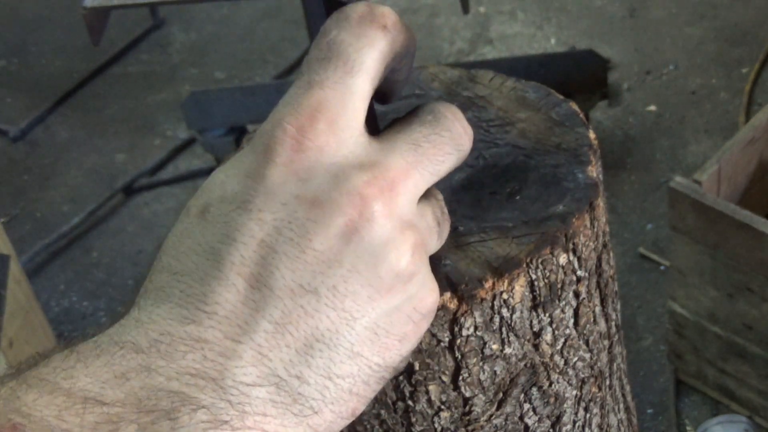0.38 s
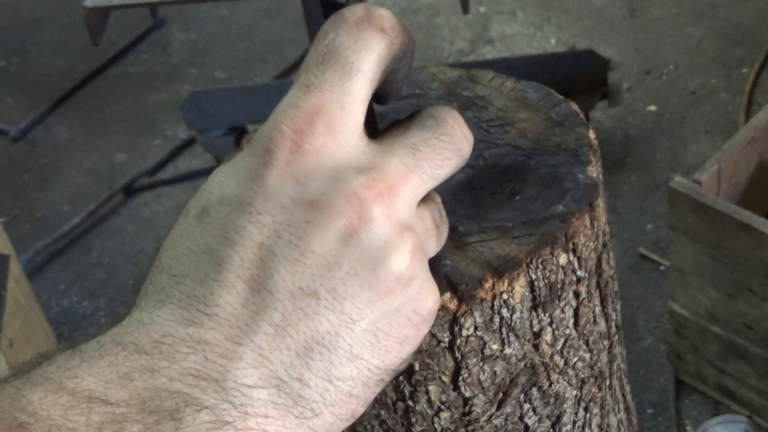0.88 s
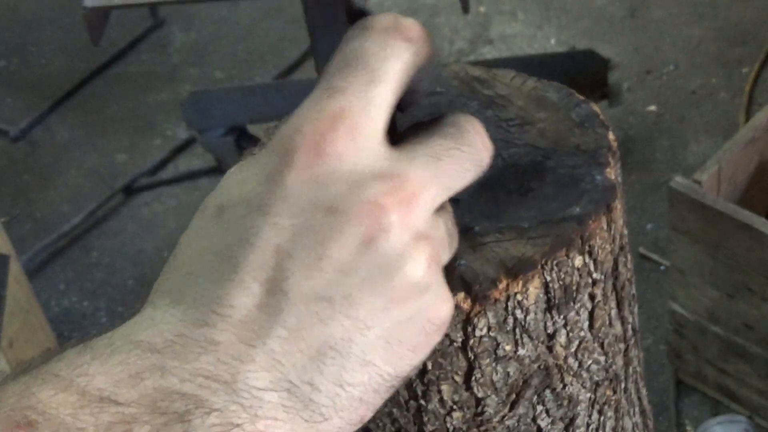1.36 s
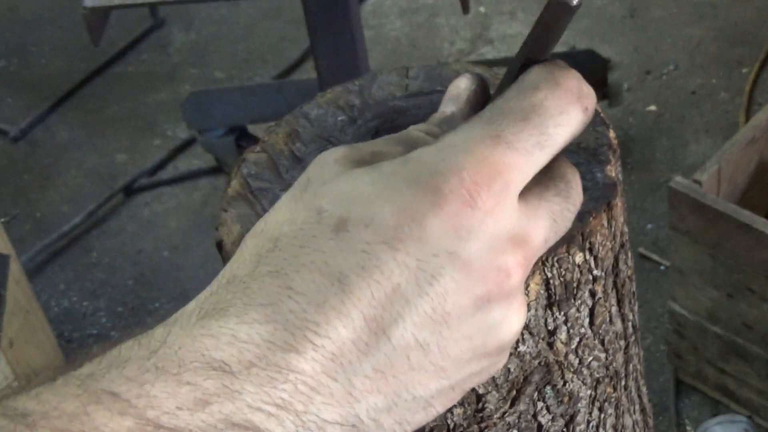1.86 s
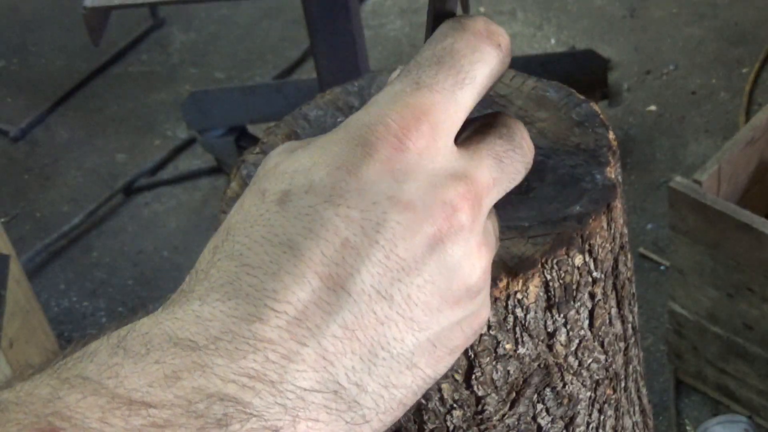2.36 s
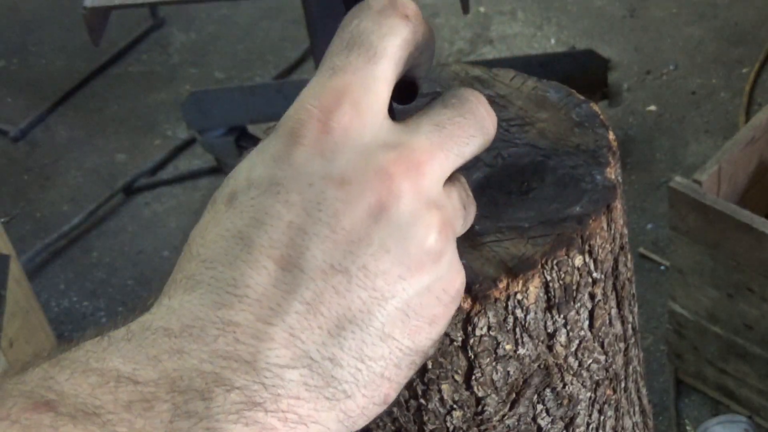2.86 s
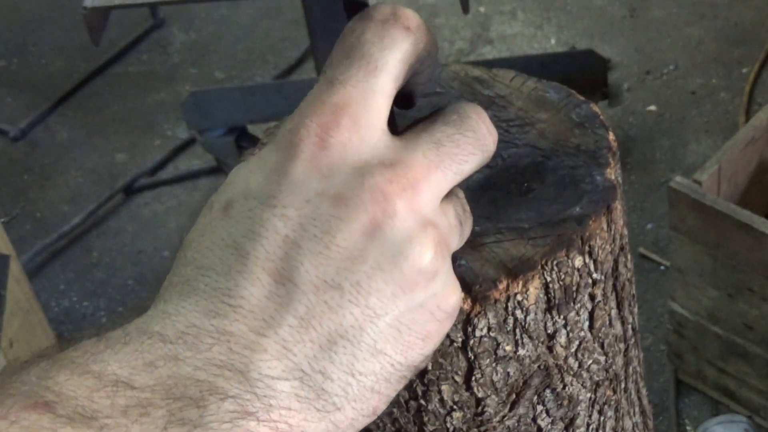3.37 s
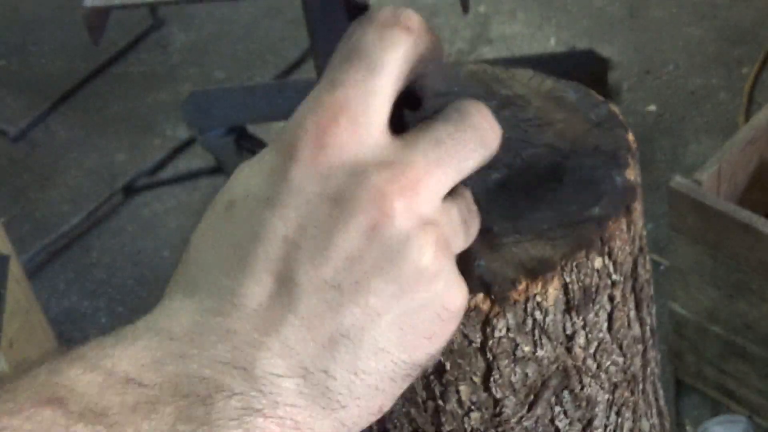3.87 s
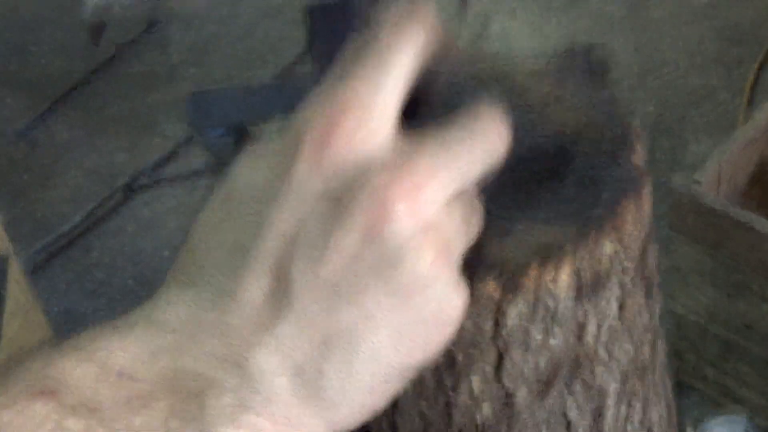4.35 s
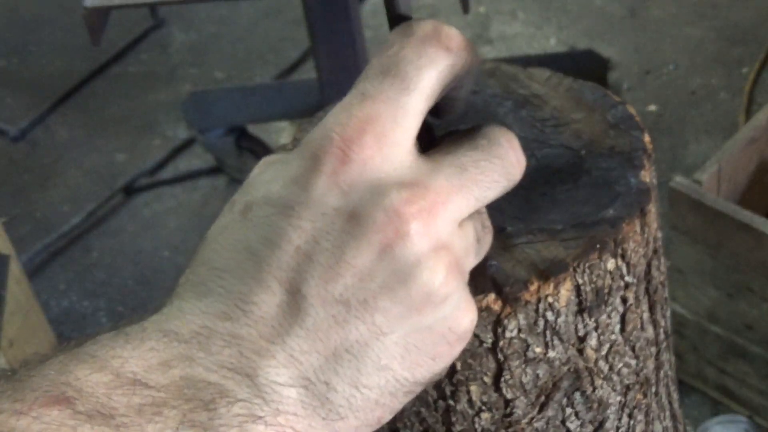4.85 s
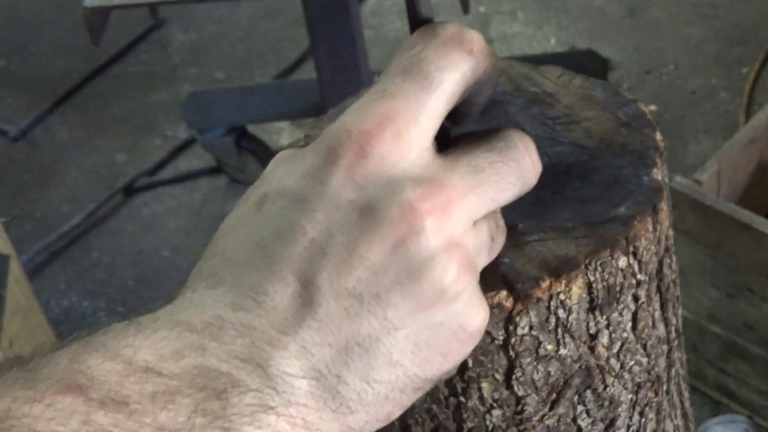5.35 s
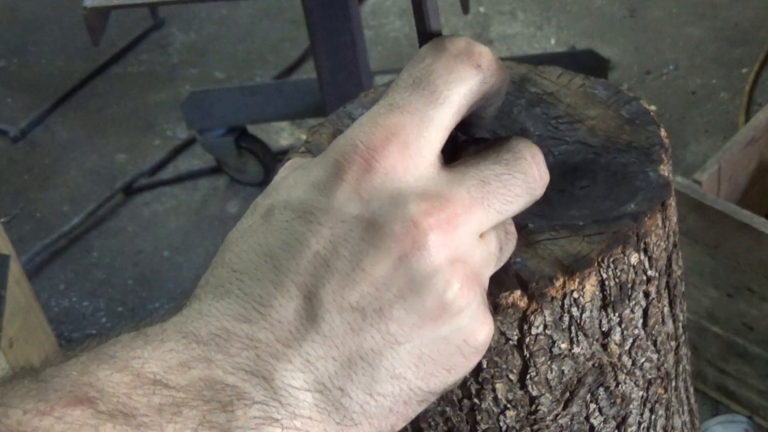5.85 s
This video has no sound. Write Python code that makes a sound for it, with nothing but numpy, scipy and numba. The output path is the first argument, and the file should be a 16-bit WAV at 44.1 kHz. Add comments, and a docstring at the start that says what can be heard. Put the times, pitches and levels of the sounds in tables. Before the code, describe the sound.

A steady, soft workshop hush with faint hum and a barely audible rapid camera blip runs throughout. From 0 to 0.55 s fingers rustle airily and tick on steel. A light, narrow metallic tap comes at 0.6 s, then a huge bright steel crack at 1.08 s with a short woody, midrange knock, close echoes and a room tail fading within half a second; a faint low drone lingers longer. Around 1.7 s a tiny steel part clinks, with small rustles and clicks until 2.7 s, and a dull distant thud at 2.86 s. A stronger tap lands at 3.27 s, a soft thud at 3.69 s, then full blows at 3.74, 4.33, 4.9, 5.5 and 6.07 s, all similarly loud and squashed at the peak. Between them are faint drones, ticks and thuds near 4.75 and 5.93 s. The last blow is slightly drier, with no drone.

```python
"""Over steady room hush, hum and a faint periodic blip, fingers rustle as band-shaped noise and tick as short bursts.
A hammer drives a hand-held steel punch into steel on a log: a light tap and a full blow, later a tap and five blows.
Each stroke sums damped modes of punch, work and log with a resonant crack; echoes and a noise tail answer it.
After all but the last blow something loose drones as a decaying sine; dull thuds of noise over a low mode follow.
The camera's look-ahead limiter flattens the full blows."""
import sys
import numpy as np
from scipy import signal
from scipy.fft import rfft, irfft, next_fast_len
from scipy.io import wavfile
from scipy.ndimage import uniform_filter1d, minimum_filter1d
from numba import njit

SR = 44100
rng = np.random.default_rng(int(sys.argv[2]) if len(sys.argv) > 2 else 0)


def int16_out(signal):
    """Quantize to a 16-bit WAV file."""
    q = np.round(np.clip(np.atleast_2d(signal).T, -1, 1) * 32767)
    wavfile.write(sys.argv[1], SR, q.astype(np.int16))


def boost_factor(decibels):
    """Convert a level in decibels to a linear amplitude factor."""
    exponent = np.asarray(decibels, float) / 20
    return 10 ** exponent


N = 274522  # length in samples

# Source levels are those ahead of the room, the high-pass on the hits and the limiter.
# Spectrum of the room hush, relative: frequency_hz, density_db
HUSH_SPECTRUM = [(15, -44), (25, -18.5), (48, -6.5), (135, -9.5), (167, -5.5), (202, -17.5), (259, -4),
                 (288, -13), (809, -12), (1090, -14), (3150, -22.5), (15200, -33), (16500, -43)]
# Left-right likeness of the hush: frequency_hz, likeness (1 = nearly alike)
HUSH_LIKENESS = [(60, 1.0), (180, 1), (550, 0.91), (1650, 0.78), (4970, 0.62), (15000, 1)]
# Steady hum lines: frequency_hz, rms_db
HUM_LINES = [(57.5, -86.5), (259, -81.5), (521, -79)]
# Skin rubbing: centre_s, half_length_s, level_db, brightest_hz
RUBS = [(0.061, 0.037, -56, 8900), (0.193, .025, -60, 9400), (0.44, 0.026, -71.5, 9300),
        (0.734, 0.037, -73, 10700), (0.944, 0.027, -69, 8800), (1.516, 0.017, -66, 8950),
        (1.983, 0.019, -67, 8940), (2.962, 0.027, -74.5, 9060), (4.147, 0.016, -62, 8000)]
# Spectrum of rubbing skin, relative: frequency_hz, density_db
SKIN_SPECTRUM = [(1500, -13), (4000, -11), (7000, -8), (11000, -13.5), (15000, -17), (18000, -30.5)]
# Small clicks of fingers and grit on steel: centre_s, peak_db, pitch_hz, length_s
TICKS = [(0.252, -35.5, 6280, 0.0013), (0.3753, -41.5, 8700, 0.0011), (0.391, -48, 7940, .0008),
         (0.534, -48, 4000, .0008), (0.576, -56, 8900, .0008), (1.72, -56, 10000, 0.0009),
         (1.7345, -47, 4500, 0.0018), (1.7385, -53, 4200, .0008), (2.638, -54, 9520, 0.00091),
         (2.6903, -43, 9300, .0008), (4.122, -44, 8300, .0025), (4.271, -49, 7120, .0008),
         (5.449, -48.5, 6120, .0008), (5.72, -46, 12500, 0.00092), (5.942, -51, 8000, 0.00086)]
# Touches of a small steel part: start_s, level_db
CHIMES = [(1.7325, -67.5), (1.7374, -59)]
# Modes of the small steel part: frequency_hz, level_db, t60_s
CHIME_MODES = [(6050, 3.5, 0.08), (8200, 0, .1), (10400, -10, 0.1)]
# First echoes off near surfaces: delay_s, level_db
WALL_ECHOES = [(.0022, -4), (.0037, -11.5), (.006, -15), (0.0085, -14)]
# Reverberation time of the room: frequency_hz, t60_s
ROOM_DECAY = [(60, 0.31), (200, 0.46), (700, 0.44), (2000, 0.4), (5000, 0.34), (9000, 0.26), (14000, 0.15)]
# Slow part of the reverberant tail: frequency_hz, level_db
SLOW_TAIL = [(100, -16), (200, -23.5), (400, -37.5), (1000, -49.5), (3000, -61)]
# Left-right likeness of the tail: frequency_hz, likeness (1 = nearly alike)
ROOM_LIKENESS = [(60, 1), (150, 1), (380, 0.95), (950, 0.83), (2380, 0.9), (5980, 0.91), (15000, 1)]
# The room's strongest standing wave: frequency_hz, level_db, t60_s
STANDING_WAVE = (141, -26.5, 0.55)
# Light setting taps: start_s, stroke_level_db, crack_pitch_hz
TAPS = [(0.6053, -29.5, 5370), (3.2689, -18, 6360)]
# Full blows: start_s, stroke_level_db, crack_pitch_hz, peak_db (over the broad part of the crack),
# work_ring_db (not raised by the stroke level)
BLOWS = [(1.0754, 17, 8200, 5.5, 17.5), (3.7445, 17, 8200, 0, 18), (4.331, 17.5, 8200, 0.5, 16),
         (4.905, 18.5, 8200, 0.5, 16), (5.4993, 18, 8200, 3.5, 14.5), (6.073, 17.5, 7375, 10, 4.5)]
# How a tap splits its force, relative to the stroke level: punch_db, log_db, thump_db (direct body over
# that sent to the room), close_db (near crack), click_db, width (share of crack pitch), chatter_s (t60)
TAP_SPLIT = dict(punch_db=-9.5, log_db=5.5, thump_db=1.5, close_db=10.5, click_db=12.5, width=0.11, chatter_s=0.0045)
# How a full blow splits its force: the same names and units
BLOW_SPLIT = dict(punch_db=-21.5, log_db=-12, thump_db=-0.26, close_db=5, click_db=-2.5, width=0.33, chatter_s=0.014)
# Modes of the steel punch: frequency_hz, level_db, t60_s
PUNCH_MODES = [(1928, -8.5, 0.12), (2660, -2.5, .025), (3090, -2.5, 0.02), (4283, -0.5, 0.018),
               (4820, -7, .008)]
# Modes of the steel work: frequency_hz, level_db, t60_s
WORK_MODES = [(560, -1.5, 0.0076), (747, 1, .011), (942, 0.5, 0.012), (1100, 2, 0.012), (1317, -4.5, 0.024)]
# Modes of the log: frequency_hz, level_db, t60_s
LOG_MODES = [(89.8, -20, 0.26), (143, -18, 0.1), (213, -13.5, 0.052), (295, -2.5, 0.02), (342, 11, 0.013),
             (467, 5, 0.012), (668, -3.5, 0.021)]
# Broad part of the crack, relative: frequency_hz, gain_db
CRACK_SPECTRUM = [(100, 10.5), (500, 12.5), (1200, 5), (3000, -5), (5000, -6), (10000, 2), (11500, -8.5),
                  (15000, -13.5), (20000, -29.5)]
# First touch of the faces, relative: frequency_hz, gain_db
CLICK_SPECTRUM = [(500, -32), (2000, -12.5), (4500, -0.5), (7000, -1.5), (12000, -14.5), (16000, -19.5)]
# Drones after blows: start_s, frequency_hz, level_db, t60_s
DRONES = [(1.08, 167, -50, 3.9), (3.749, 181, -54, 1.5), (4.34, 181, -48.5, 2.5), (4.909, 181, -48, 1.2),
          (5.508, 181, -57.5, 0.92)]
# Far thuds: start_s, level_db, length_s, brightness_hz, low_mode_db
THUDS = [(2.863, -49.5, 0.07, 1400, 8.5), (3.694, -45.5, 0.041, 1500, 6.5),
         (4.735, -46.5, 0.043, 1800, 0.5), (4.812, -49.5, 0.025, 1500, 3.5), (5.934, -53, 0.014, 500, -6)]


def unit(x):
    """Root-mean-square normalisation: scales x to rms 1."""
    return x / np.sqrt(np.mean(x ** 2) + 1e-20)


def along(points, hz):
    """Interpolation on a logarithmic frequency axis through (frequency_hz, value) points."""
    f, v = np.transpose(points)
    return np.interp(np.log(hz + 1), np.log(f + 1), v)


def coloured(x, response):
    """Linear filtering: the spectrum of x is multiplied by a response of frequency."""
    size = next_fast_len(x.shape[-1] + 8192)  # zero padding keeps the end off the start
    spectrum = rfft(x, size) * response(np.fft.rfftfreq(size, 1 / SR))
    return irfft(spectrum, size)[..., :x.shape[-1]]


def paired(noises, likeness):
    """Interaural coherence: the mid-side balance of two unrelated noises sets left-right likeness."""
    def turn(hz):
        return np.arccos(np.clip(along(likeness, hz), -1, 0.98)) / 2
    mid, side = coloured(noises, lambda hz: np.array([np.cos(turn(hz)), np.sin(turn(hz))]))
    return np.array([mid + side, mid - side])


def ring(modes, t, scatter_db):
    """Modal superposition: exponentially damped sines, each with a randomly scattered strength."""
    hz, db, t60 = np.transpose(modes)[:, :, None]
    db = db + scatter_db * rng.standard_normal(db.shape)
    return np.sum(boost_factor(db - 60 * t / t60) * np.sin(2 * np.pi * hz * t), axis=0)


def add(track, start_s, sound):
    """Linear superposition of a sound on a track from its start time."""
    part = track[round(start_s * SR):][:len(sound)]
    part += sound[:len(part)]


def hush():
    """Stationary noise: filtered white noise, partly coherent between the ears, with steady hum lines."""
    air = coloured(rng.standard_normal((2, N)), lambda hz: boost_factor(along(HUSH_SPECTRUM, hz)))
    t = np.arange(N) / SR
    hum = sum(np.sqrt(2) * boost_factor(rms_db) * np.sin(2 * np.pi * hz * t) for hz, rms_db in HUM_LINES)
    return boost_factor(-64) * unit(paired(air, HUSH_LIKENESS)) + hum


def frame_tick():
    """Periodic pulse train: the camera's faint blip, a Gaussian-windowed tone thirty times a second."""
    since_s = (np.arange(N) / SR - 0.025) % (1 / 30)
    envelope = np.exp(-0.5 * ((since_s - 0.004) / 0.0015) ** 2)
    return boost_factor(-67.5) * envelope * np.sin(2 * np.pi * 3200 * since_s)


def rubbing():
    """Friction noise: random fine contacts as the grip shifts give short Gaussian swells of hiss."""
    out, t = np.zeros(N), np.arange(SR // 4) / SR
    for centre_s, half_length_s, level_db, brightest_hz in RUBS:
        def skin(hz):
            peak = 0.59 * np.exp(-((hz - brightest_hz) / 900) ** 2)
            return boost_factor(along(SKIN_SPECTRUM, hz)) + peak
        hiss = unit(coloured(rng.standard_normal(len(t)), skin))
        start_s = max(centre_s - t[-1] / 2, 0)
        swell = np.exp(-0.5 * ((t + start_s - centre_s) / half_length_s) ** 2)
        add(out, start_s, boost_factor(level_db) * swell * hiss)
    return out


def ticks():
    """Impulsive contact: brief band-limited noise bursts, and the damped modes of a small steel part."""
    out, t = np.zeros(N), np.arange(SR // 5) / SR
    lead_s, width = 0.01, 0.77  # room for the burst's rise; bandwidth as a share of its pitch
    for centre_s, peak_db, pitch_hz, length_s in TICKS:
        grit = np.exp(-((t - lead_s) / length_s) ** 2) * rng.standard_normal(len(t))
        grit = coloured(grit, lambda hz: np.exp(-((hz / pitch_hz - 1) / width) ** 2))
        add(out, centre_s - lead_s, boost_factor(peak_db) * grit / np.abs(grit).max())
    for start_s, level_db in CHIMES:
        add(out, start_s, boost_factor(level_db) * ring(CHIME_MODES, t, scatter_db=2))
    return out


def room(near, sent):
    """Reverberation: discrete early echoes, then a diffuse tail that swells and decays band by band."""
    hz, t, z = signal.stft(rng.standard_normal((2, 2 * SR)), SR, nperseg=512)
    main_fade = boost_factor(-60 * t / along(ROOM_DECAY, hz)[:, None])
    slow_fade = boost_factor(along(SLOW_TAIL, hz)[:, None] - 60 * t / 1.25)  # the bass lingers
    evened = z / np.sqrt(np.abs(z))  # square-root magnitudes fluctuate less
    noise = signal.istft(evened * (main_fade + slow_fade), SR, nperseg=512)[1]
    tail = paired(noise, ROOM_LIKENESS)
    tail_s = np.arange(tail.shape[1]) / SR
    tail = tail * (1 - np.exp(-tail_s / 0.0036))
    tail = boost_factor(-4.5) * tail / np.linalg.norm(tail[0])
    tail = tail + boost_factor(-30) * ring([STANDING_WAVE], tail_s, scatter_db=0)
    echoes = sum(boost_factor(level_db) * np.roll(near, round(delay_s * SR)) for delay_s, level_db in WALL_ECHOES)
    return echoes + signal.fftconvolve(sent[None], tail, axes=1)[:, :N]


def causal(gain, size):
    """Minimum phase: the folded cepstrum gives the most compact causal response with this gain."""
    cepstrum = irfft(np.log(gain(np.fft.rfftfreq(2 * size, 1 / SR)) + 1e-6))
    folded = np.r_[cepstrum[0], 2 * cepstrum[1:size], np.zeros(size)]
    return irfft(np.exp(rfft(folded)))[:size]


def stroke(crack_hz, peak_db, work_db, punch_db, log_db, thump_db, close_db, click_db, width, chatter_s):
    """Impact excitation: modes ring and the meeting faces crack near a pitch: (direct, sent to the room)."""
    t = np.arange(SR // 4) / SR
    driven = boost_factor(work_db) * ring(WORK_MODES, t, scatter_db=2) + boost_factor(log_db) * ring(LOG_MODES, t, scatter_db=3)
    driven = driven * (1 - np.exp(-(t / 0.002) ** 2))  # the push builds up behind the crack
    body = driven + boost_factor(punch_db) * ring(PUNCH_MODES, t, scatter_db=3.5)

    def crack(hz):
        resonance = 1 / (1 + ((hz / crack_hz - 1) / width) ** 2) ** 2
        return boost_factor(along(CRACK_SPECTRUM, hz) - peak_db) + resonance

    def smear(pulse, noise):
        return signal.fftconvolve(pulse, noise / np.linalg.norm(noise))[:len(t)]

    snap = causal(crack, size=len(t))
    snap = snap / np.abs(snap).max()
    click = causal(lambda hz: boost_factor(along(CLICK_SPECTRUM, hz)), size=len(t))  # too brief to fill the room
    click = click / np.abs(click).max()
    decay = boost_factor(-60 * t / chatter_s)
    chatter = np.diff(decay * rng.standard_normal(len(t)), prepend=0)  # differencing brightens it
    grit = decay * rng.standard_normal(len(t))
    close = boost_factor(close_db) * smear(snap, chatter) + boost_factor(click_db) * smear(click, grit)
    return boost_factor(thump_db) * body + close, body + boost_factor(10) * snap


def hammer():
    """Superposed impacts: light taps crack narrowly and hardly move the work; full blows drive it."""
    near, sent = np.zeros(N), np.zeros(N)
    strokes = []
    for start_s, level_db, crack_hz in TAPS:
        sounds = stroke(crack_hz, peak_db=25.5, work_db=-34.5, **TAP_SPLIT)
        strokes.append((start_s, level_db, sounds))
    for start_s, level_db, crack_hz, peak_db, work_ring_db in BLOWS:
        sounds = stroke(crack_hz, peak_db, work_ring_db - level_db, **BLOW_SPLIT)
        strokes.append((start_s, level_db, sounds))
    for start_s, level_db, (direct, wet) in strokes:
        add(near, start_s, boost_factor(level_db) * direct)
        add(sent, start_s, boost_factor(level_db) * wet)
    return near, sent


def sheet():
    """Free damped vibration: something loose nearby drones after a blow as one decaying sine."""
    out, t = np.zeros(N), np.arange(3 * SR) / SR
    for start_s, hz, level_db, t60_s in DRONES:
        add(out, start_s, boost_factor(level_db - 60 * t / t60_s) * np.sin(2 * np.pi * hz * t))
    return out


def thuds():
    """Soft impact: a drawn-out contact gives dull low-passed noise over a low mode."""
    out, t = np.zeros(N), np.arange(SR // 2) / SR
    for start_s, level_db, length_s, brightness_hz, low_mode_db in THUDS:
        def dull(hz):
            return hz / (hz + 90) / (1 + (hz / brightness_hz) ** 2) / (1 + hz / 500)
        shape = (1 - np.exp(-t / 0.0016)) * np.exp(-(t / length_s) ** 2)
        low_mode = boost_factor(low_mode_db) * np.sin(2 * np.pi * 143 * t)
        scrape = unit(coloured(rng.standard_normal(len(t)), dull))
        add(out, start_s, boost_factor(level_db) * shape * (low_mode + scrape))
    return out


def scene():
    """Direct and reverberant fields: hits sound both ways, high-passed; drone, rubbing and hush stay dry."""
    background, rubs, clicks = hush(), rubbing(), ticks()
    near, sent = hammer()
    far = thuds()
    reverberant = room(near, sent + boost_factor(-6.5) * clicks + far)
    hits = near + clicks + 0.93 * far + reverberant
    hits = signal.sosfilt(signal.butter(N=2, Wn=140, btype="high", fs=SR, output="sos"), hits)
    return hits + sheet() + rubs + background


@njit
def recover(need_db, keep):
    """Exponential relaxation: gain follows a drop at once and climbs back gradually."""
    out = need_db.copy()
    for i in range(1, len(out)):
        out[i] = min(need_db[i], out[i - 1] * keep)
    return out


def limiter(x, top_db, ahead_s, release_s):
    """Automatic gain control: one look-ahead gain for both sides ducks peaks above the top, then recovers."""
    need_db = np.minimum(0, top_db - 20 * np.log10(np.abs(x).max(axis=0) + 1e-9))
    size = round(ahead_s * SR)
    held_db = recover(minimum_filter1d(need_db, size=2 * size + 1), np.exp(-1 / (release_s * SR)))
    return x * boost_factor(uniform_filter1d(held_db, size=size))


def low_pass(x):
    """Removes everything above the highest recorded frequency."""
    return signal.sosfilt(signal.butter(12, 16780, fs=SR, output="sos"), x)


def record(dry):
    """Peak limiting and band limitation: the blip joins the scene ahead of the limiter and low-pass."""
    heard = limiter(dry + frame_tick(), top_db=-3.3, ahead_s=0.00055, release_s=0.062)
    heard = signal.sosfilt(signal.butter(N=8, Wn=16000, fs=SR, output="sos"), heard)
    return low_pass(heard)


dry = scene()
out = record(dry)
int16_out(out)
```